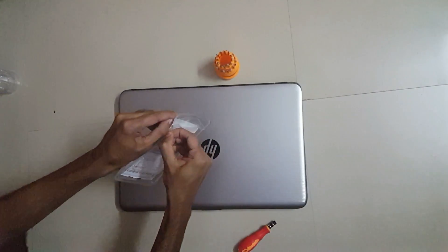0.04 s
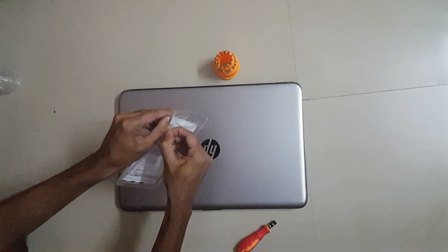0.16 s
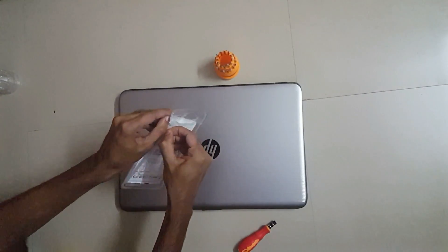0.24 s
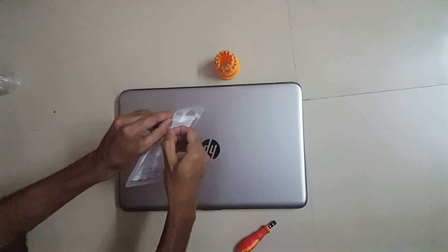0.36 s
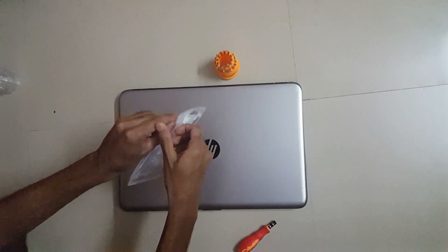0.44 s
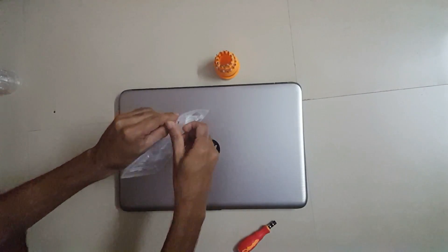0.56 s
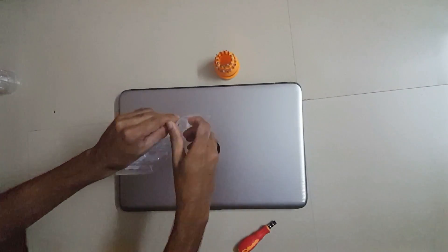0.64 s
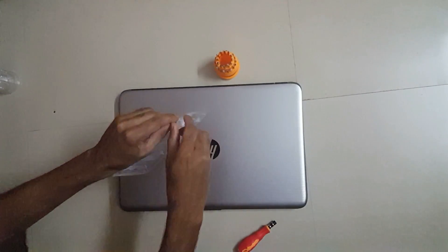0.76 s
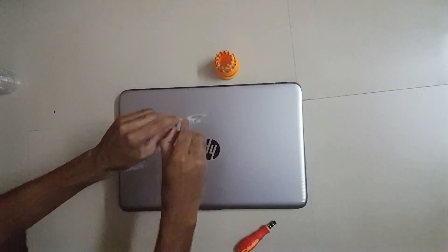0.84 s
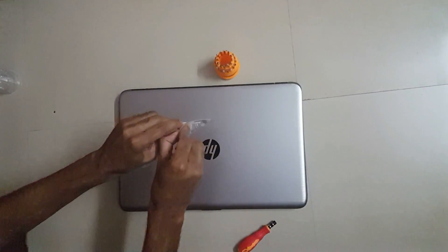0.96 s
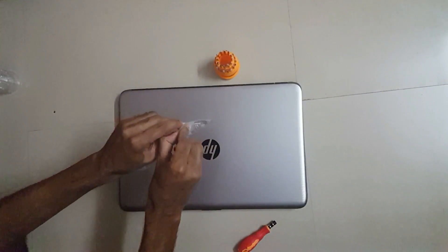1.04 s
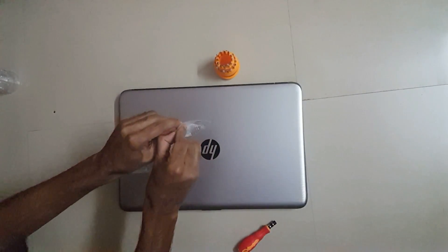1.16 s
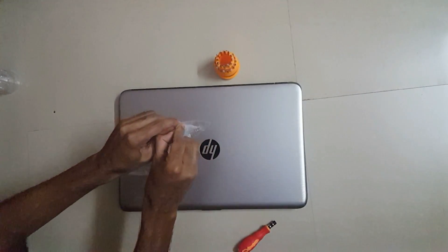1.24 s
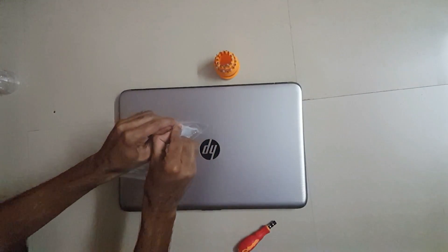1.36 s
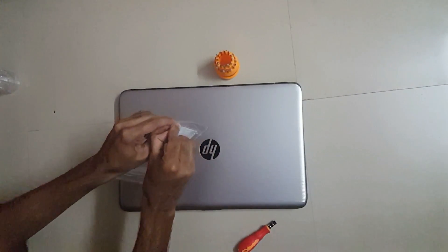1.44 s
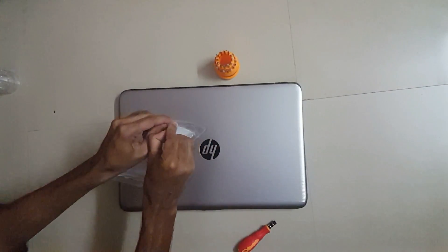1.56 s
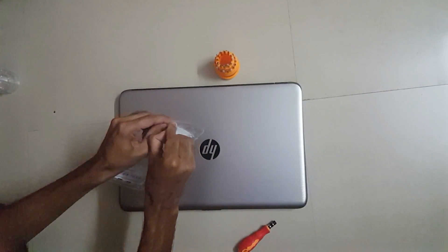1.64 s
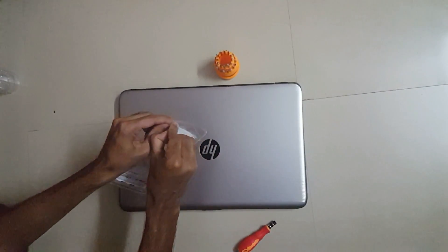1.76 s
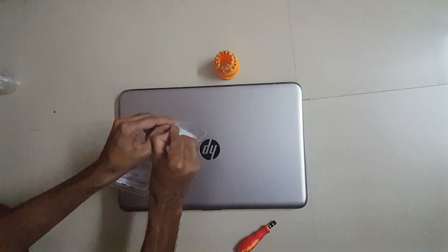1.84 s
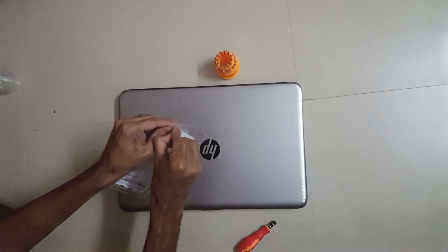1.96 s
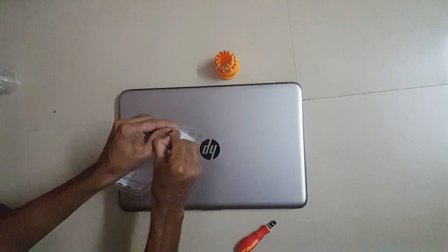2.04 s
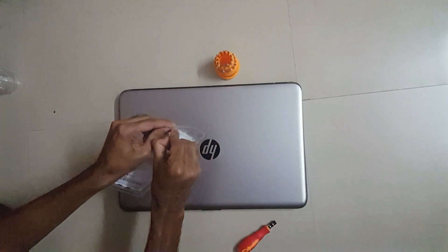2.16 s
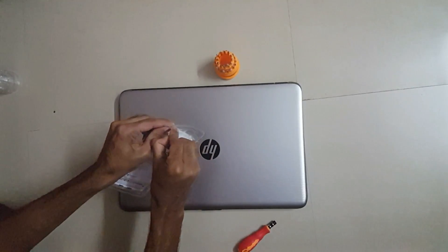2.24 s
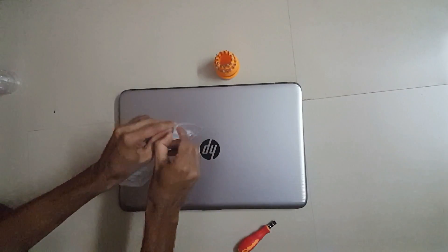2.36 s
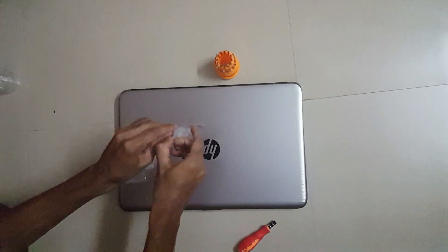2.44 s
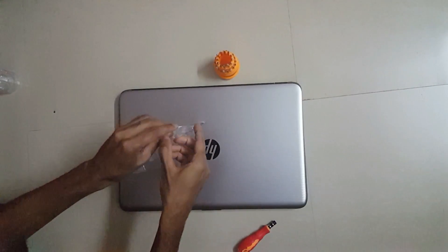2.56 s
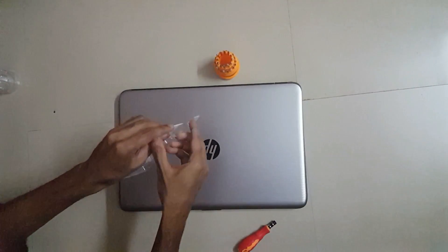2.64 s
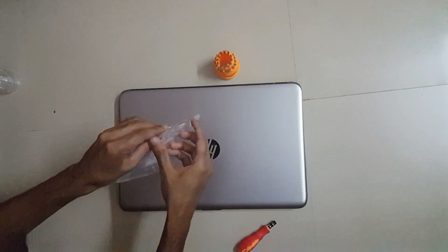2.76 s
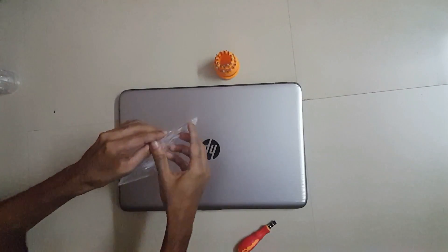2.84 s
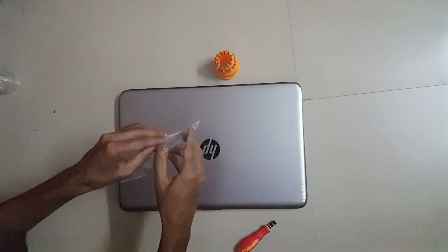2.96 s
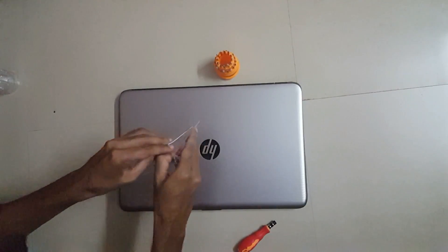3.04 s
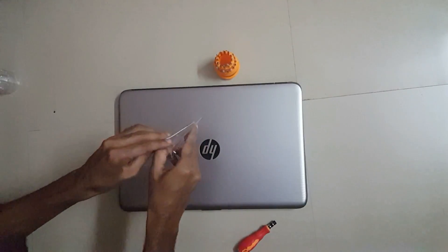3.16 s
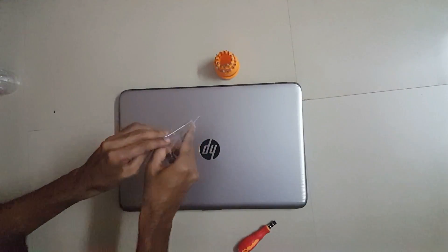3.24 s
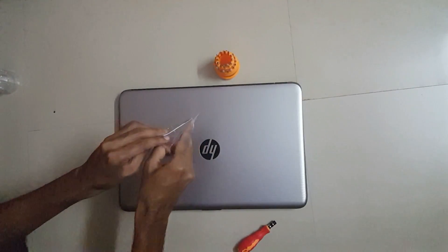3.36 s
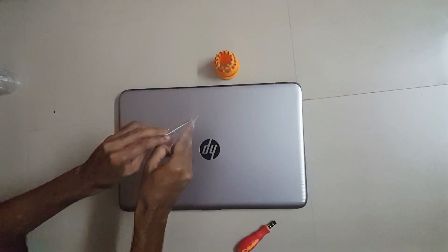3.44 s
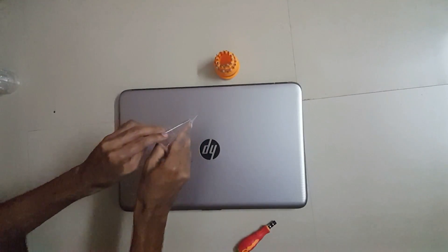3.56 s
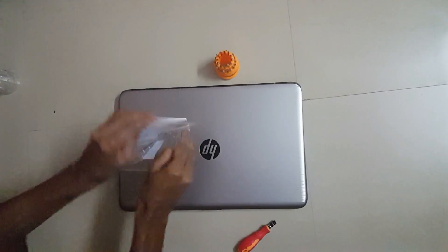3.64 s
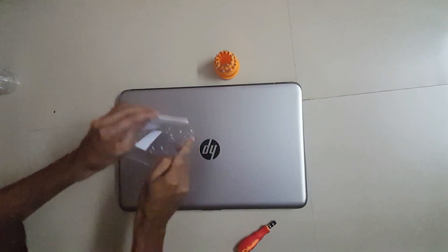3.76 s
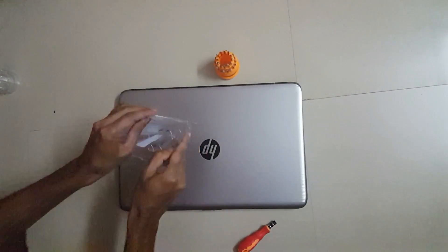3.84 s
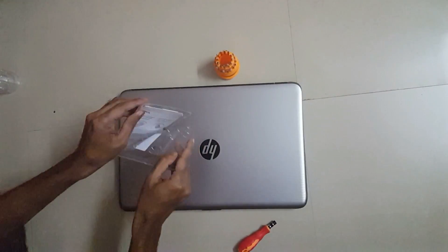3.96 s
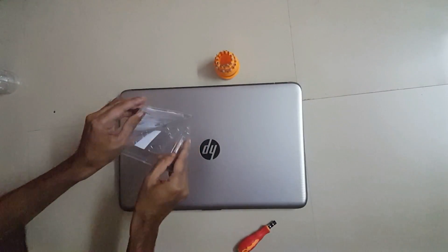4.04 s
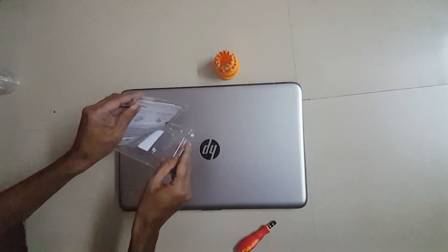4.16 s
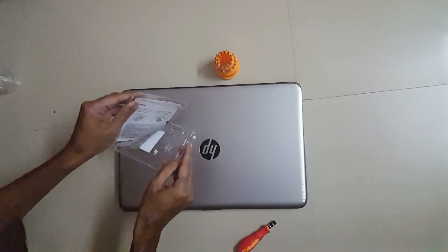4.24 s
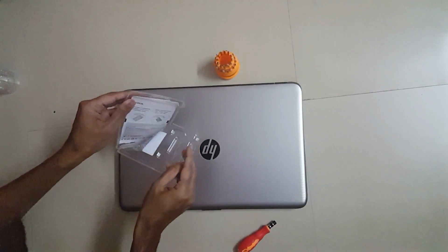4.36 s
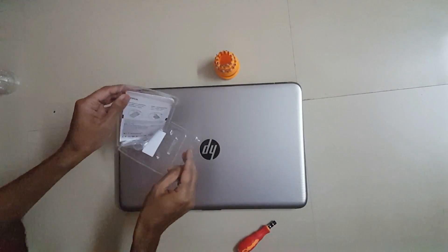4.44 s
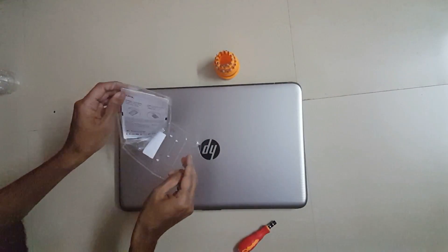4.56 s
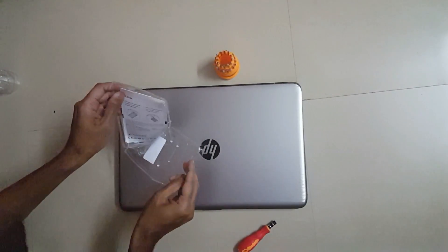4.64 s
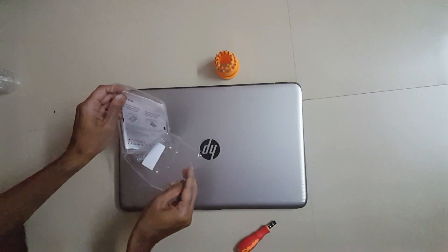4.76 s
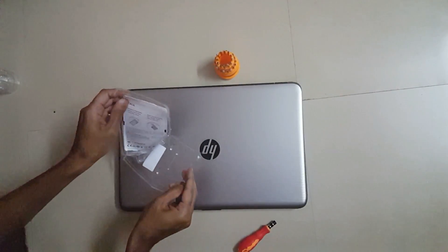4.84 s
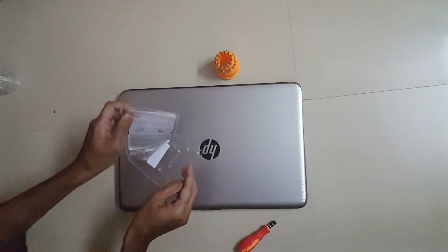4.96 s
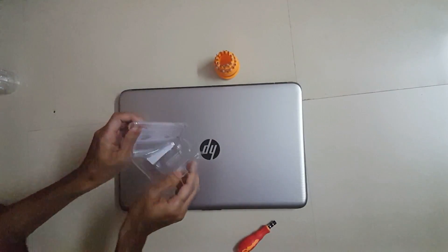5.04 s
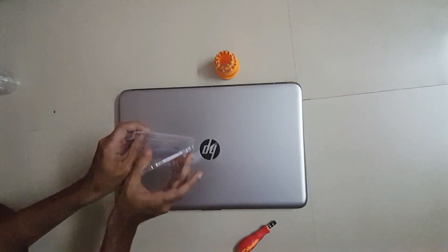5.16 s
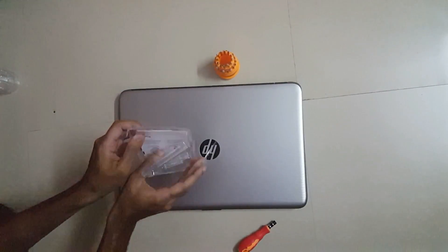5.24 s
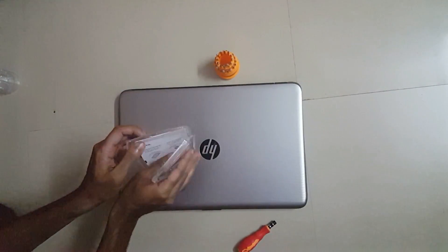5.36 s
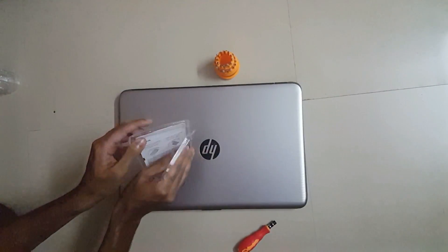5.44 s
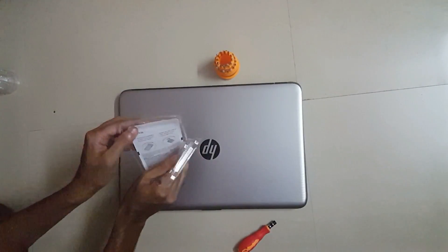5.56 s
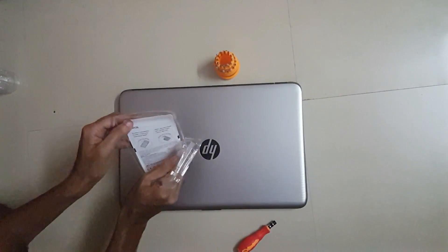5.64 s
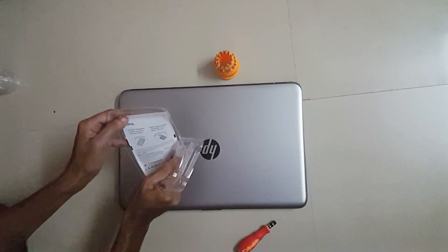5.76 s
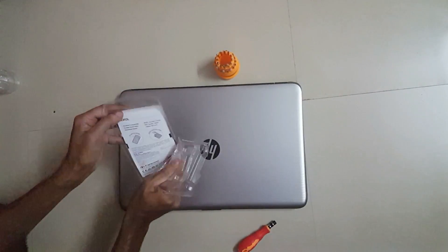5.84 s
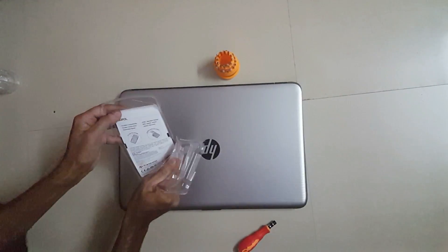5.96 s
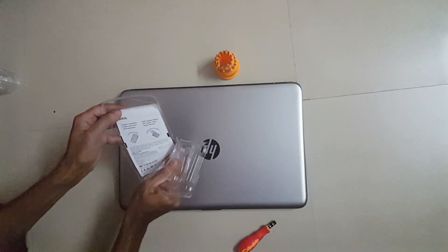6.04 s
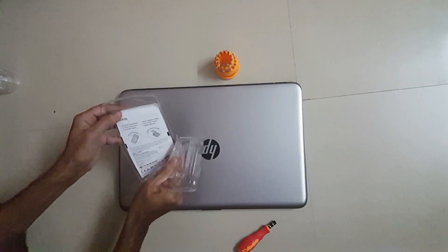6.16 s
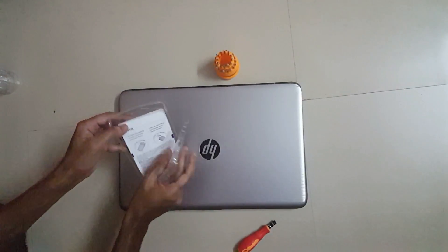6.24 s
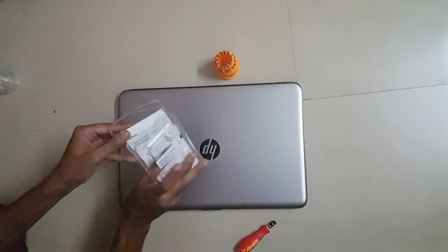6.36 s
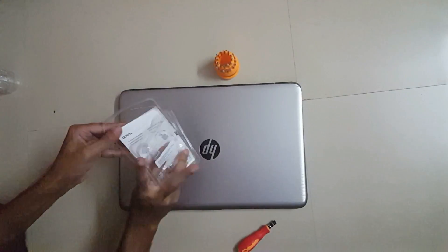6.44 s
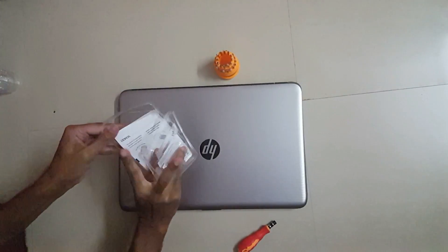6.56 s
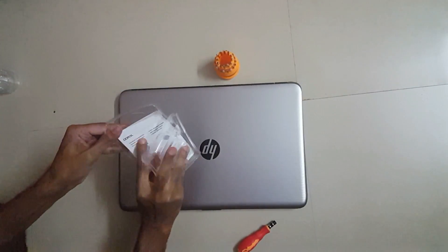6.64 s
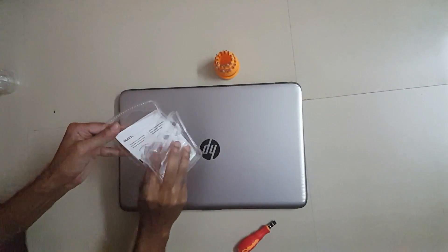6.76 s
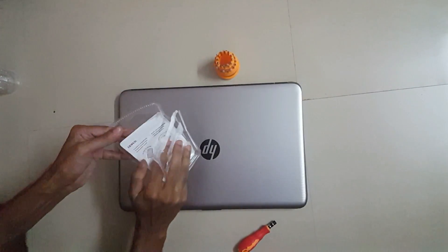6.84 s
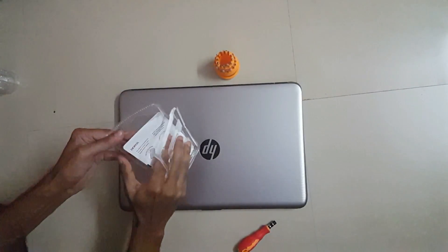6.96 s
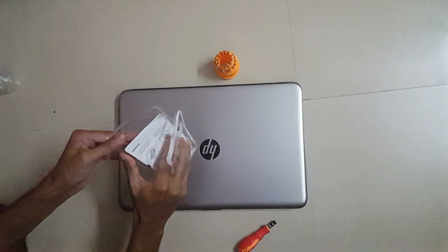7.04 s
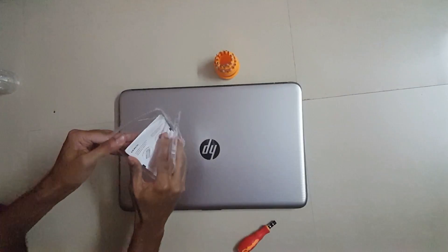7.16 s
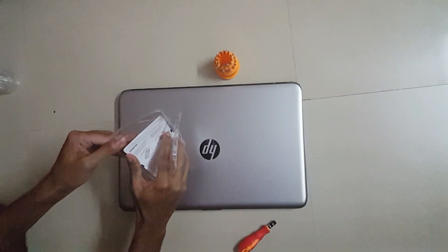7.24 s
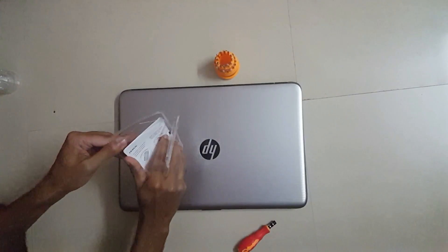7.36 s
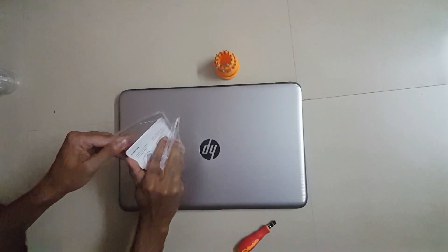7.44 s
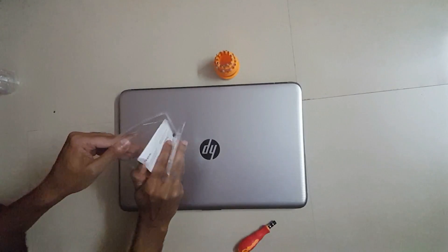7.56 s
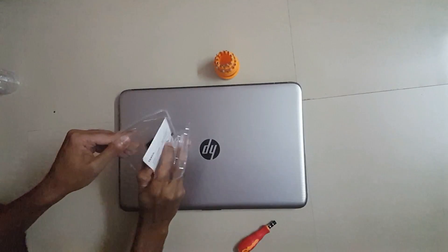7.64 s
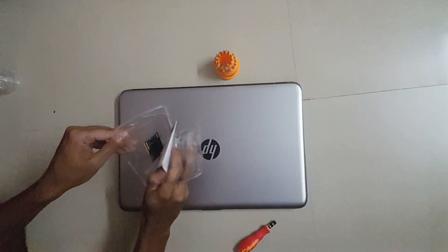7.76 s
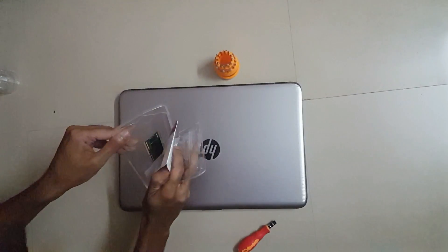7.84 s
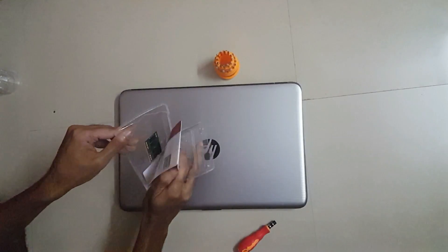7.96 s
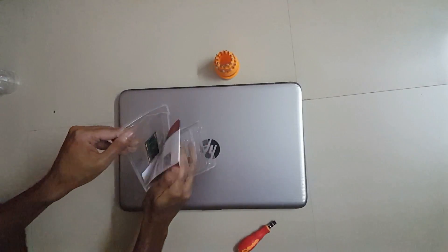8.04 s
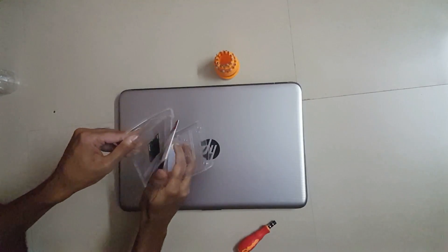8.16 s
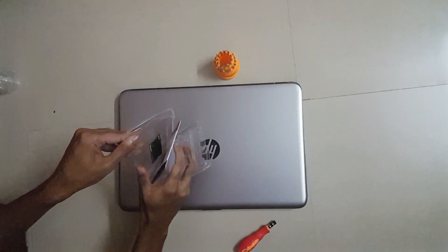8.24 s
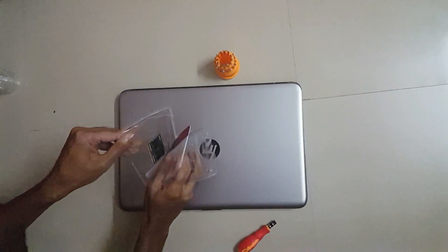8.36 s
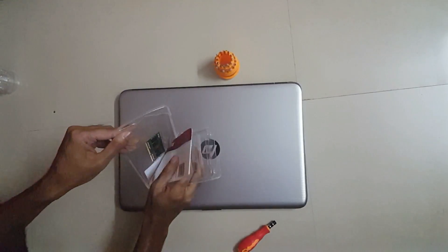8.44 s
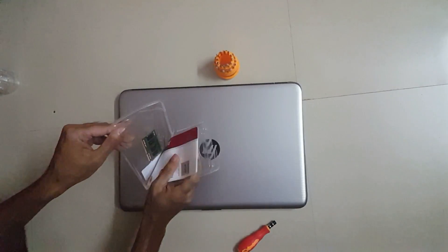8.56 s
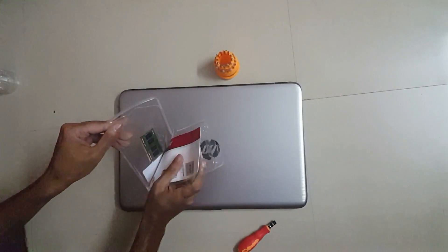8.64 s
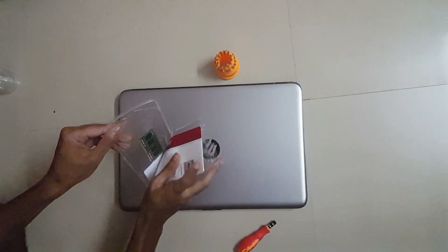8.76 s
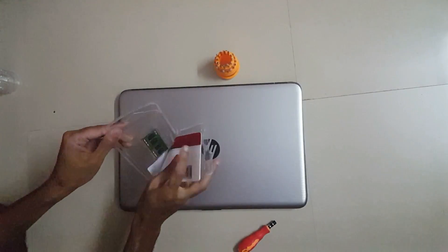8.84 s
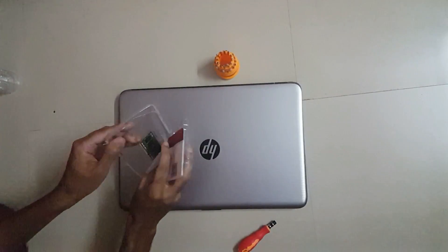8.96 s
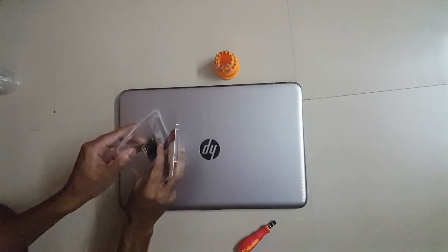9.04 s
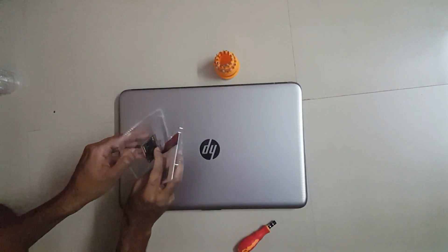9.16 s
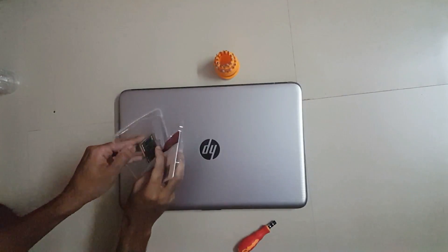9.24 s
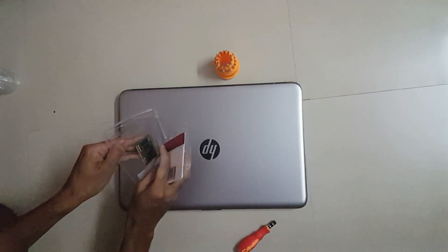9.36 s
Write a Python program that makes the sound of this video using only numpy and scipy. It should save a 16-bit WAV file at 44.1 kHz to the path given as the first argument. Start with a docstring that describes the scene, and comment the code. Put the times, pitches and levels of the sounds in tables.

```python
"""Light ticks of thin plastic over faint room noise: a blister pack is picked at, prised open and folded back.
Ticks and snaps are noise bursts in four bands; the seam bursts twice, and tones ring on after the loudest snaps.
Low pops and dull finger thuds are decaying sines, air thumps are low noise; rubs, tearing and crinkles are
grainy stick-slip noise. A close stereo microphone hears it in a small hard-walled room; its limiter ducks
after the loudest snaps."""
import sys
import numpy as np
from scipy import signal
from scipy.io import wavfile
from scipy.ndimage import uniform_filter1d

SR = 44100
rng = np.random.default_rng(int(sys.argv[2]) if len(sys.argv) > 2 else 0)


def put_to_file(sound):
    """Save the sound as 16-bit audio at rate SR, in the file named by the first command-line argument."""
    columns = np.atleast_2d(sound).T  # one column per channel
    safe = np.clip(columns, -1, 1)
    whole_steps = np.round(safe * 32767)
    wavfile.write(sys.argv[1], SR, whole_steps.astype(np.int16))


N = 414099   # length in samples

# edges of the noise filter bank, two thirds of an octave apart
EDGES_HZ = 25 * 2 ** (np.arange(15) * 2 / 3)

# buckles that stand out: [t/s, 800-2500 Hz level over 5 ms before trim/dB, facet pitch f/Hz,
# fizz above 6 kHz relative to that level/dB]
SNAPS = [(0.3821, -54.5, 2590, -2), (0.4073, -52.5, 1670, -14), (0.5707, -52.5, 1510, -37),
         (0.6537, -54, 1560, -26), (0.6841, -40, 1520, -16), (0.7197, -49, 1660, -8),
         (1.546, -56, 1580, -11), (1.6276, -46, 1170, 9.5), (2.0017, -53.5, 2270, -41),
         (2.0135, -57, 1060, -32), (2.067, -52.5, 2260, 6), (2.077, -53.5, 2250, 9), (2.122, -49, 2300, 6),
         (2.215, -57, 2470, -7), (2.279, -49, 1150, -1.5), (2.3872, -54, 2210, -11),
         (2.4012, -53, 1680, -8), (2.432, -37, 2440, -3), (2.593, -46, 2000, -15.5),
         (2.776, -50.5, 2100, -31), (2.8182, -51.5, 1580, -23), (2.84, -51.5, 1600, -5),
         (2.8891, -50.5, 1590, -5.5), (2.9805, -51.5, 1600, -10), (3.275, -21, 2160, -23),
         (3.318, -47.5, 2310, 2), (3.3393, -33.5, 2340, 6.5), (3.3754, -46.5, 2450, 3.5),
         (3.4425, -49, 2300, 1), (3.4493, -46, 2180, -19.5), (3.5027, -46, 2590, 9),
         (3.5759, -34.5, 1570, -6.5), (3.5879, -44.5, 2450, 1), (3.645, 5.5, 2260, -4.5),
         (3.9516, -31.5, 1170, -13), (3.9682, -33.5, 1290, -19), (4.0949, -30.5, 1800, -14),
         (4.1143, -40, 1790, -24), (4.548, -48.5, 1089, -34), (4.5912, -47.5, 1370, -28),
         (4.7933, -61.5, 1990, 6), (4.928, -48, 1670, -11.5), (4.9448, -47, 1694, -3.5),
         (5.025, -53, 1570, 1), (5.0442, -33.5, 1390, -40), (5.058, -40.5, 1260, -4),
         (5.0825, -40.5, 1510, -0.5), (5.1178, -43, 2140, -21), (5.1409, -35.5, 1750, -13),
         (5.215, -45, 2160, -4), (5.2866, -16.5, 2098, -16.5), (5.4652, -43.5, 1134, -22),
         (5.7266, -64, 1650, 10), (5.804, -48.5, 825, 6.5), (5.8192, -40.5, 1840, 8.5),
         (5.8442, 2.5, 940, -4.5), (5.855, -10, 840, -7), (6.3651, -33.5, 1446, -31),
         (6.6491, -47, 1606, -16), (6.7399, -55, 1550, -26), (6.827, -57.5, 1553, -23),
         (7.1642, -36.5, 812, -13), (7.5001, -48, 1440, -20), (7.5077, -34.5, 1240, -42),
         (7.6005, -32, 1180, -25), (7.7256, -45, 1130, -19), (7.7839, -34, 1390, -23.5),
         (8.0116, -48.5, 1690, -28), (8.0709, -51.5, 1570, -32), (8.182, -54.5, 1493, -37),
         (8.367, -46, 820, -30), (8.4258, -21.5, 1370, -4.5), (8.7231, -45, 2320, -9.5),
         (8.7958, -50.5, 2170, -7.5), (8.8693, -52.5, 1560, -28), (9.0648, -49, 1520, -6.5),
         (9.1423, -37.5, 1410, -13), (9.1967, -48.5, 1590, -8), (9.286, -36, 1520, -9.5),
         (9.2956, -43, 1400, 0), (9.3299, -38.5, 1470, -20), (9.37, -24.5, 1480, -11.5)]
# body, main, crack and fizz of a buckle: [low f/Hz, high f/Hz, filter order]
SNAP_BANDS = [(250, 800, 2), (800, 2500, 2), (2500, 6000, 3), (6000, 14000, 3)]
# left-right likeness of the close sound: [f/Hz, correlation]
DIRECT_LIKENESS = [(200, 1), (700, 0.67), (1500, 0.74), (3000, 0.68), (6000, 0.15), (12000, 0.085)]


def snaps(buckles, rise_s=.0005, burst_s=.0028, damping_slope=0.056, kick=3.0, lead_s=.0002, trim_db=-0.69,
          facet_width_hz=320, facet_db=7, facet_fade=0.088, flutter_db=-8.5, flutter_t60=0.073):
    """Each buckle shakes the sheet's crowded modes for a few ms, the high ones briefest; a weak flutter lingers."""
    s, level, pitch, fizz = np.transpose(buckles)
    body, crack = body_and_crack(level, pitch, fizz)
    t = np.arange(SR // 20) / SR
    first_5_ms = t < .005
    # a light tick flips one facet with a pitch of its own; a hard snap is less pitched
    facet = from_db(facet_db - facet_fade * (level - np.median(level)))
    sounds = 0
    for (low, high, order), colour in zip(SNAP_BANDS, (body, 0, crack, fizz)):
        hz = np.sqrt(low * high)
        modes = rng.standard_normal((len(s), 2, len(t))).swapaxes(0, 1)
        attack = 1 - np.exp(-t / rise_s)
        burst = np.exp(-(t / (burst_s * (1400 / hz) ** damping_slope)) ** 2)
        flutter = from_db(flutter_db - 60 * t / flutter_t60)
        shake = modes * attack * (burst + flutter)
        shake[0, :, round(rise_s * SR)] += kick   # a single click at the onset
        ring = stereo(band(shake, low, high, order=order), at_hz(DIRECT_LIKENESS, hz))
        for k in np.flatnonzero((pitch > low) & (pitch < high)):
            ring[:, k] += facet[k] * resonance(ring[:, k], pitch[k], facet_width_hz)
        onset_rms = np.sqrt(np.mean(ring[..., first_5_ms] ** 2, axis=(0, 2)))
        strength = from_db(level + colour + trim_db) / onset_rms
        sounds = sounds + ring * strength[:, None]
    out = np.zeros((2, N))
    for k, start in enumerate(s):
        add(out, sounds[:, k], start - lead_s)
    return out


# a buckle's colour changes from light tick to hard snap between these levels
LIGHT_DB, HARD_DB = -32, -25
# body below 800 Hz at the median pitch, relative to the level
LIGHT_BODY_DB, HARD_BODY_DB = -10.5, -15.5
BODY_DB_PER_OCTAVE = 7   # body lost as the facet's pitch rises
# crack at 2.5-6 kHz, relative to the level
LIGHT_CRACK_DB, HARD_CRACK_DB = 1.5, -4
CRACK_FOLLOWS = 0.61   # share of its lost fizz that a dull tick also loses as crack


def body_and_crack(level, pitch, fizz):
    """Wide, low facets have more body; a hard snap always cracks, a dull light tick loses crack with its fizz."""
    hard = np.clip((level - LIGHT_DB) / (HARD_DB - LIGHT_DB), 0, 1)
    octaves = np.log2(pitch / np.median(pitch))
    body = (1 - hard) * LIGHT_BODY_DB + hard * HARD_BODY_DB - BODY_DB_PER_OCTAVE * octaves
    light_crack = LIGHT_CRACK_DB + CRACK_FOLLOWS * np.minimum(fizz, 0)
    crack = (1 - hard) * light_crack + hard * HARD_CRACK_DB
    return body, crack


FACET_LOW_HZ, FACET_HIGH_HZ = 1000, 2430   # pitch range of the welds and faint ticks
# the seam unzips: its welds give way in a quick, nearly even run
SEAM_START_S, SEAM_END_S, WELD_JITTER_S = 3.658, 3.716, .0015
WELD_DB, WELD_SPREAD_DB, WELD_FIZZ_DB = .5, 4, -5.5   # level before trim; fizz relative to it


def seam(count=8):
    """Weld after weld lets go, each a hard buckle with a pitch of its own; rows as in SNAPS."""
    late, size = rng.standard_normal((count, 2)).T
    s = np.linspace(SEAM_START_S, SEAM_END_S, count) + WELD_JITTER_S * late
    pitch = rng.permutation(np.geomspace(FACET_LOW_HZ, FACET_HIGH_HZ, count))
    return np.column_stack([s, WELD_DB + WELD_SPREAD_DB * size, pitch, np.full(count, WELD_FIZZ_DB)])


# tones that ring on after the loudest snaps, from shell and near surfaces:
# [f/Hz, level relative to the snap before trim/dB, t60/s]
AFTERTONES = [(480.3, -24, 0.32), (713, -16.5, 0.36), (799, -15.5, 0.26), (847, -15, 0.14),
              (944, -14, 0.11), (1026, -11.5, 0.18), (1084, -13, 0.14), (1185, -12, 0.14),
              (1486, -18, 0.14), (1660, -18, .15)]
BURST_DB = -12   # only a snap as loud as a bursting seam leaves tones behind


def aftertones(trim_db=-2.0, spread_db=1.4, rise_s=0.00059):
    """Shell and near surfaces ring on after the loudest snaps: decaying sines, each with a strength of its own."""
    out, t = np.zeros((2, N)), np.arange(SR // 3) / SR
    hz, db, t60 = np.transpose(AFTERTONES)[..., None]
    attack = 1 - np.exp(-t / rise_s)
    tones = from_db(db - 60 * t / t60) * np.sin(2 * np.pi * hz * t) * attack
    for s, level, *_ in SNAPS:
        if level > BURST_DB:
            strengths = from_db(spread_db * rng.standard_normal(len(tones)))
            add(out, from_db(level + trim_db) * (strengths @ tones), s)
    return out


# low pops of the shell and dull finger thuds: [t/s, f/Hz, peak level/dB, t60/s]
POPS_AND_THUDS = [(1.70, 295, -49.5, .09), (2.432, 483, -34.5, 0.027), (3.018, 400, -34.5, 0.016),
                  (3.276, 330, -30, 0.036), (3.576, 786, -30, 0.033), (5.045, 476, -44, .04),
                  (5.215, 470, -43, 0.072), (5.845, 776, -6.5, 0.07), (7.164, 378, -38, 0.051),
                  (7.164, 789, -35.5, .04), (7.785, 800, -36.5, 0.046), (8.369, 333, -34, 0.059),
                  (8.369, 715, -32, 0.12), (8.369, 1573, -30.5, 0.028)]


def pops_and_thuds(rise_s=0.00027):
    """Low pops of the shell and dull finger thuds, as decaying sines."""
    out, t = np.zeros((2, N)), np.arange(SR // 4) / SR
    attack = 1 - np.exp(-t / rise_s)
    for s, hz, db, t60 in POPS_AND_THUDS:
        note = np.sin(2 * np.pi * hz * t)
        add(out, attack * from_db(db - 60 * t / t60) * note, s)
    return out


# air pushed out as the halves spring apart: [t/s, level/dB, centre f/Hz, t60/s]
PUFFS = [(3.647, -25.5, 111.3, 0.33), (5.845, -23.5, 106.2, 0.11), (8.426, -37.5, 85, 0.054)]


def puffs():
    """A wide flip of the shell shoves air: a short low thump."""
    out, t = np.zeros((2, N)), np.arange(SR // 2) / SR
    for s, db, hz, t60 in PUFFS:
        air = rms_one(band(rng.standard_normal(len(t)), hz / 1.8, hz * 2.0))
        add(out, from_db(db - 60 * t / t60) * air, s)
    return out


# faint buckles: level before trim, fizz relative to it
TICK_DB, TICK_SPREAD_DB, TICK_FIZZ_DB, TICK_FIZZ_SPREAD_DB = -60.5, 2.5, -11.5, 6.5


def ticks(effort, count=10):
    """Faint buckles fall at random, more densely under effort; rows as in SNAPS."""
    when, facet = rng.random((count, 2)).T
    size, sharpness = rng.standard_normal((count, 2)).T
    strain = np.cumsum(np.minimum(effort, 1) ** 2)
    share = (np.arange(count) + when) / count   # one tick per equal share of strain
    s = np.searchsorted(strain / strain[-1], share) / SR
    pitch = FACET_LOW_HZ * (FACET_HIGH_HZ / FACET_LOW_HZ) ** facet
    fizz = TICK_FIZZ_DB + TICK_FIZZ_SPREAD_DB * sharpness
    return np.column_stack([s, TICK_DB + TICK_SPREAD_DB * size, pitch, fizz])


# rubs and tearing, and very short bursts of noise within snaps:
# [middle t/s, length at half swell/s, level before trim/dB, centre f/Hz]
RUBS_AND_BURSTS = [(0.587, 0.031, -64, 1490), (0.705, 0.033, -60, 1450), (2.35, .04, -64.5, 2000),
                   (2.42, 0.033, -48.5, 1610), (2.764, 0.047, -59, 1900), (2.94, .08, -67, 2160),
                   (3.692, 0.0085, -5, 2170), (3.715, .02, -9, 1170), (4.007, .07, -33, 1320),
                   (4.126, .03, -44, 1780), (4.947, 0.029, -52, 1490), (5.481, 0.075, -53.5, 1863),
                   (5.852, .004, -4, 1050), (6.301, 0.058, -59, 1400), (6.926, 0.039, -66.5, 1877),
                   (7.166, 0.025, -51, 1990), (7.307, .06, -67.5, 2300), (7.509, .003, -32.5, 3134),
                   (7.605, 0.0046, -35.5, 1836), (7.729, .01, -46, 1720), (8.63, 0.12, -56.5, 1396),
                   (9.145, 0.061, -51.5, 1740)]


def rubs_and_bursts(width=1.37, hiss_db=-13.5, trim_db=0.5):
    """Rubs, tearing and very short bursts within snaps: swells of grainy noise in one broad band, plus hiss."""
    out, grain = np.zeros((2, N)), slips(per_s=650, spread_db=3.0, t60=0.003)
    for s, length, db, hz in RUBS_AND_BURSTS:
        count = round(2 * length * SR)
        grains = rng.standard_normal((2, count)) * grain[round(s * SR):][:count]
        tone = rms_one(band(grains, hz / width, hz * width))
        hiss = rms_one(band(grains, 600, 5500))
        sound = stereo(tone + from_db(hiss_db) * hiss, at_hz(DIRECT_LIKENESS, hz))
        add(out, from_db(db + trim_db) * sound * np.hanning(count), s - length)
    return out


# crinkling sheet, relative spectrum: [f/Hz, level per Hz/dB]
CRINKLE = [(150, -12.5), (400, -11), (900, -1), (1600, 1.5), (3000, -6.5), (6000, -10.5), (15000, -24)]
# shuffling fingers, relative spectrum: [f/Hz, level per Hz/dB]
FINGERS = [(60, -11.5), (130, -2.5), (300, -1), (600, -5.5), (1200, -11), (4000, -35)]


def handling(effort, crinkle_db=-69.0, fingers_db=-68.5, ticks_per_s=70):
    """More effort brings more and stronger crinkles, and a louder dull shuffling of fingers."""
    crackle = slips(ticks_per_s * np.sqrt(effort), spread_db=10.5, t60=0.028)
    crinkle = coloured(CRINKLE, DIRECT_LIKENESS, crackle)
    shuffle = slips(per_s=120, spread_db=5.0, t60=0.062)
    fingers = coloured(FINGERS, ROOM_LIKENESS, shuffle)
    return effort * (from_db(crinkle_db) * crinkle + from_db(fingers_db) * fingers)


def slips(per_s, spread_db, t60):
    """Envelope of tiny stick-slip releases of uneven size at random moments."""
    sizes = from_db(max(spread_db, 0) * np.minimum(rng.exponential(1, N), 2.5))
    born = rng.random(N) < per_s / SR
    power_decay = from_db(-120 / (t60 * SR))   # -60 dB in power per t60
    power = signal.lfilter([1], [1, -power_decay], (born * sizes) ** 2 + 1e-18)
    return np.sqrt(power)


# the hands tighten around each buckle and rest between
GRIP_S, GRIP_LAG_S, GRIP_DB, REST_DB = 0.12, 0.015, -2, -7.5   # grip at the median buckle level
GRIP_FOLLOWS = 0.13   # dB of effort per dB of the buckle's level
# after a hard snap the sprung shell shifts in the fingers while it settles; SETTLE_DB for a buckle at 0 dB
SETTLE_S, SETTLE_DB, SETTLE_FOLLOWS = .55, 11, 0.68


def hand_effort():
    """Effort as a gain: it swells around each buckle, lingers after hard snaps and sinks to rest between."""
    t = np.arange(0, N / SR, .005)
    s, level = np.transpose(SNAPS)[:2]
    since = t[:, None] - s
    grip_gain = from_db(GRIP_DB + GRIP_FOLLOWS * (level - np.median(level)))
    grips = grip_gain * np.exp(-((since - GRIP_LAG_S) / GRIP_S) ** 2 / 2)
    settle_gain = from_db(SETTLE_DB + SETTLE_FOLLOWS * level) * (level > HARD_DB)
    settling = settle_gain * (since > 0) * np.exp(-(since / SETTLE_S) ** 2)
    effort = np.sqrt(from_db(REST_DB) ** 2 + np.sum(grips ** 2 + settling ** 2, axis=1))
    return np.interp(np.arange(N) / SR, t, effort)


# colour of the shell: [f/Hz, width/Hz, level/dB]
SHELL = [(1070, 67, 1.5), (1530, 600, 2), (1820, 340, -1), (2145, 55, 2), (3020, 1100, 3.5),
         (4270, 350, 0.5)]


def shell(x):
    """The moulded shape favours some pitches and swallows others."""
    for hz, width_hz, db in SHELL:
        x = x + (from_db(db) - 1) * resonance(x, hz, width_hz)
    return x


# decay of the room: [f/Hz, t60/s]
ROOM_T60 = [(150, 0.2), (500, 0.37), (1400, 0.31), (3700, 0.36), (9000, 0.29), (15000, .23)]
# strength of the room's return: [f/Hz, level/dB]
ROOM_SEND = [(150, -5.5), (500, -3), (1400, -5.5), (3700, -5.5), (9000, -1.5), (15000, -6.5)]
# left-right likeness of diffuse sound: [f/Hz, correlation]
ROOM_LIKENESS = [(40, 0.22), (120, 0.92), (300, .92), (700, 0.54), (1500, 0.025), (3000, 0.01),
                 (6000, 0.055), (15000, 0)]


def room(x, gap_s=0.006, build_s=0.00099):
    """Hard floor and near walls return a dense tail that dies band by band."""
    t, response = np.arange(SR // 2) / SR, 0
    onset = 1 - np.exp(-np.maximum(t - gap_s, 0) / build_s)
    for low, high in zip(EDGES_HZ[2:], EDGES_HZ[3:]):
        hz = np.sqrt(low * high)
        decay = from_db(-60 * t / at_hz(ROOM_T60, hz))
        echoes = band(rng.standard_normal((2, len(t))) * onset * decay, low, high)
        echoes = rms_one(stereo(echoes, at_hz(ROOM_LIKENESS, hz)))
        band_share = np.sqrt(2 * (high - low) / SR / len(t))   # energy in step with bandwidth
        response = response + from_db(at_hz(ROOM_SEND, hz)) * echoes * band_share
    return signal.fftconvolve(x, response, axes=1)[:, :N]


# room noise, relative spectrum: [f/Hz, level per Hz/dB]
AMBIENCE = [(25, -22.5), (50, -23), (90, -8), (150, -10), (300, -14.5), (600, -15.5), (1200, -18),
            (2000, -30), (3300, -27), (5000, -35.5), (9000, -39), (15000, -40)]
AMBIENCE_DB, HUM_DB, HUM_HZ = -62.5, -73, 96.9   # rms levels


def ambience():
    """Steady room noise with a faint low hum."""
    hum = from_db(HUM_DB) * np.sqrt(2) * np.sin(2 * np.pi * HUM_HZ * np.arange(N) / SR)
    return from_db(AMBIENCE_DB) * coloured(AMBIENCE, ROOM_LIKENESS) + hum


def coloured(spectrum, likeness, envelope=1):
    """Stereo noise under an envelope, through a bank of bands; rms 1."""
    white, out = rng.standard_normal((2, 2, N)) * envelope, 0
    for k, (low, high) in enumerate(zip(EDGES_HZ, EDGES_HZ[1:])):
        hz = np.sqrt(low * high)
        # neighbouring bands take turns on two separate noises
        pair = stereo(band(white[k % 2], low, high), at_hz(likeness, hz))
        out = out + from_db(at_hz(spectrum, hz)) * pair
    return rms_one(out)


def stereo(pair, likeness):
    """Two unrelated signals become left and right with the given correlation."""
    c = np.clip(likeness, -.99, .99)
    mid, side = np.sqrt((1 + c) / 2) * pair[0], np.sqrt((1 - c) / 2) * pair[1]
    return np.array([mid + side, mid - side])


def resonance(x, hz, width_hz):
    """One resonance, gain 1 on top."""
    return signal.lfilter(*signal.iirpeak(hz, hz / width_hz, fs=SR), x)


def band(x, low_hz, high_hz, order=2):
    """Causal band-pass."""
    edges = [low_hz, min(high_hz, SR / 2 - 1000)]
    return signal.sosfilt(signal.butter(order, edges, "band", fs=SR, output="sos"), x + 1e-18)


def from_db(db):
    """Decibels to gain."""
    return 10 ** (np.asarray(db) / 20)


def rms_one(x):
    """Scale to unit rms."""
    return x / np.sqrt(np.mean(x ** 2) + 1e-20)


def at_hz(points, hz):
    """Read a table on a log-frequency axis."""
    table = np.array(points)
    return np.interp(np.log(hz), np.log(table[:, 0]), table[:, 1])


def add(out, sound, s):
    """Mix a sound in at a time in seconds."""
    i = max(round(s * SR), 0)
    out[:, i:i + sound.shape[-1]] += sound[..., :max(N - i, 0)]


def scene(pan_db=0.5):
    """The pack is held a little to the left, so its sound reaches that side first."""
    effort = hand_effort()
    buckles = np.vstack([SNAPS, seam(), ticks(effort)])
    surface = shell(snaps(buckles) + rubs_and_bursts() + handling(effort))
    pack = surface + aftertones() + pops_and_thuds() + puffs()
    left = pack[0] * from_db(pan_db)
    right = np.roll(pack[1], 2) * from_db(-pan_db)   # two samples later
    return np.array([left, right]) + room(pack) + ambience()


def limiter(x, threshold_db=-7.0, release_db_per_s=12.0):
    """The gain drops at once when the 5 ms level passes the threshold, then creeps back."""
    power = uniform_filter1d(np.mean(x ** 2, axis=0), size=SR // 200)
    over = np.maximum(10 * np.log10(np.abs(power) + 1e-12) - threshold_db, 0)
    ramp = release_db_per_s * np.arange(N) / SR
    return x * from_db(ramp - np.maximum.accumulate(over + ramp))


CUTOFF_HZ = 15800


def record(dry, top=0.77, low_cut_hz=32):
    """Limiter, rounded peaks, a rumble filter and a steep top cut."""
    rounded = top * np.tanh(limiter(dry) / top)
    lean = signal.sosfilt(signal.butter(2, low_cut_hz, "high", fs=SR, output="sos"), rounded)
    return signal.sosfilt(signal.cheby1(12, .2, CUTOFF_HZ, fs=SR, output="sos"), lean)


dry = scene()
out = record(dry)
put_to_file(out)
```